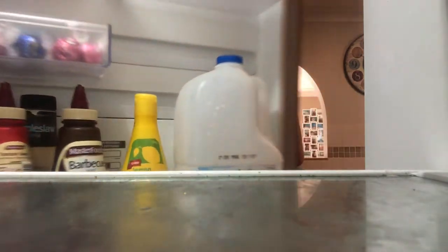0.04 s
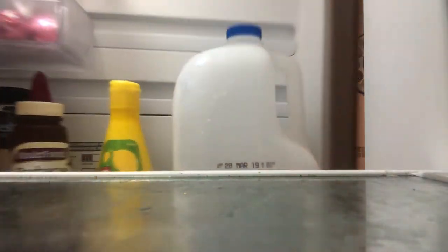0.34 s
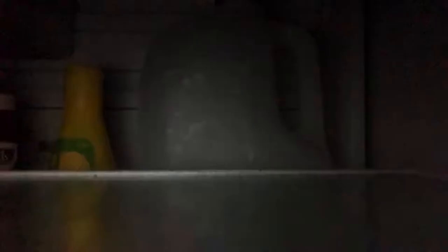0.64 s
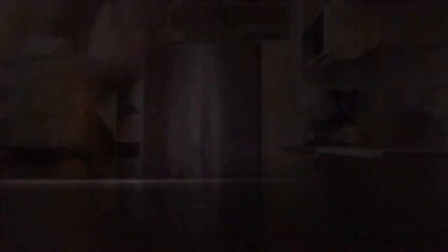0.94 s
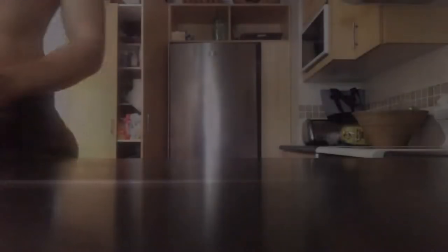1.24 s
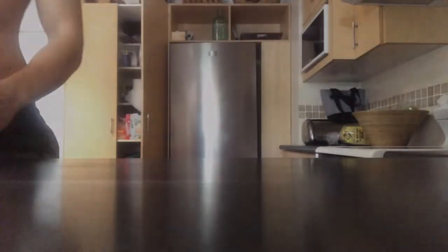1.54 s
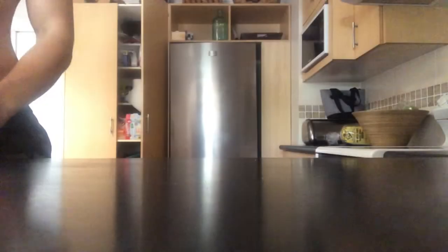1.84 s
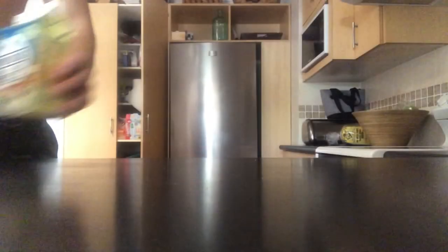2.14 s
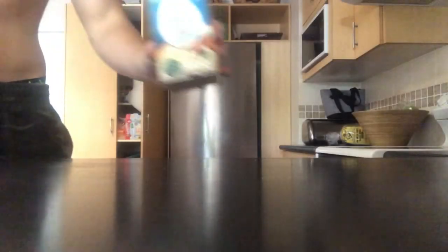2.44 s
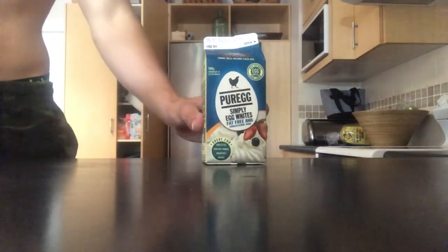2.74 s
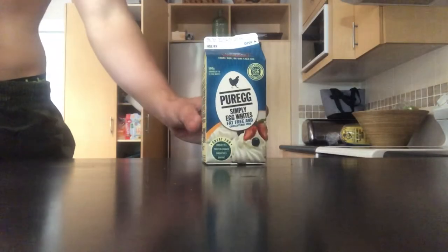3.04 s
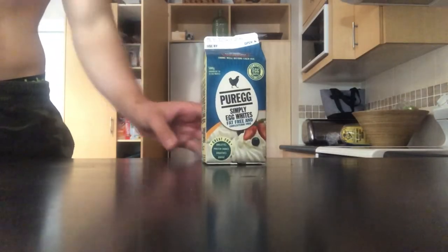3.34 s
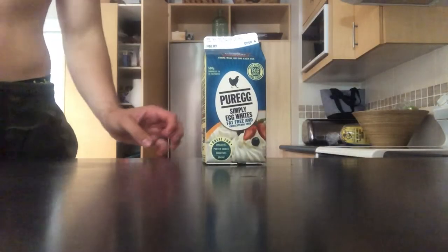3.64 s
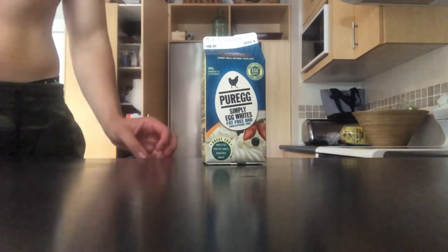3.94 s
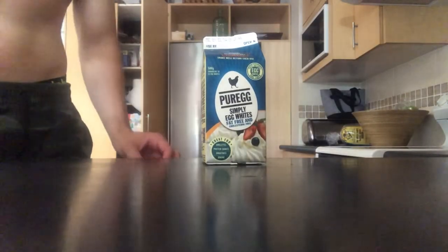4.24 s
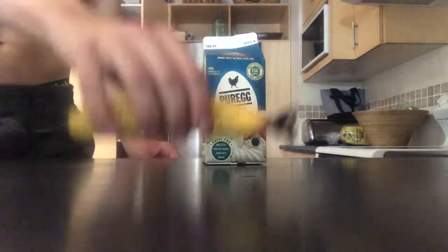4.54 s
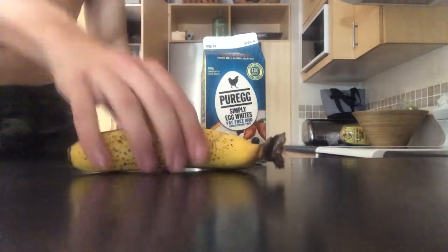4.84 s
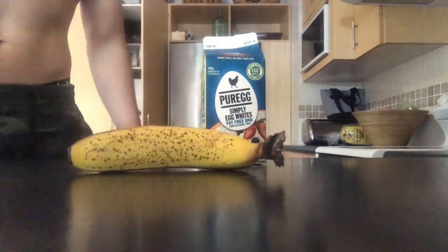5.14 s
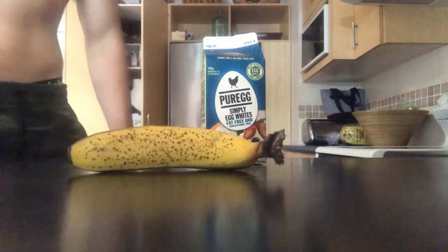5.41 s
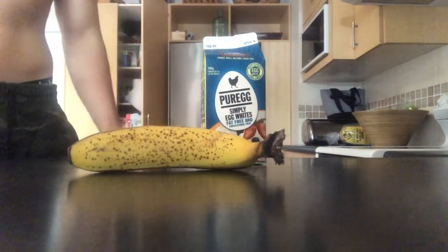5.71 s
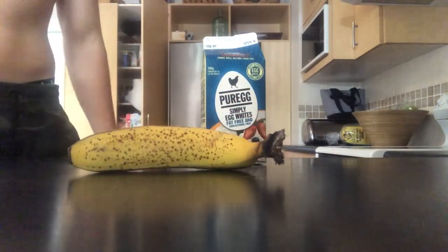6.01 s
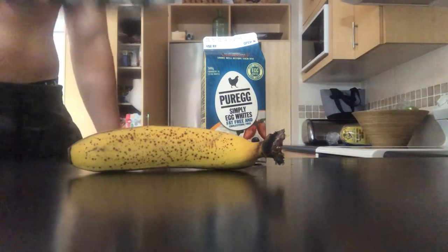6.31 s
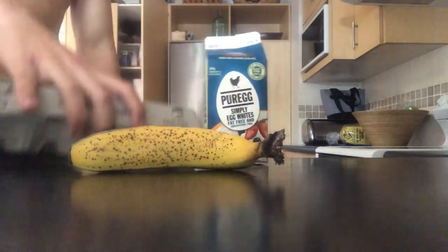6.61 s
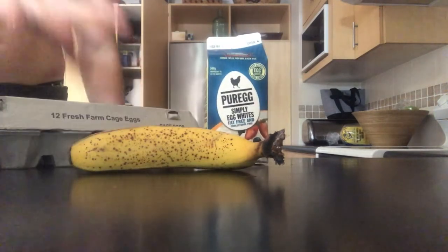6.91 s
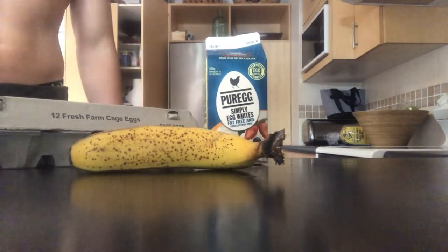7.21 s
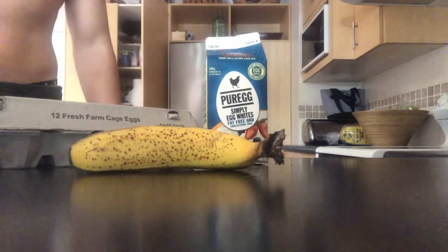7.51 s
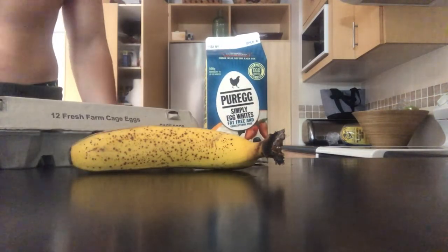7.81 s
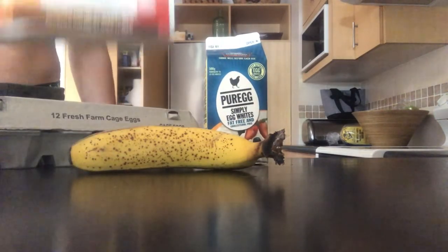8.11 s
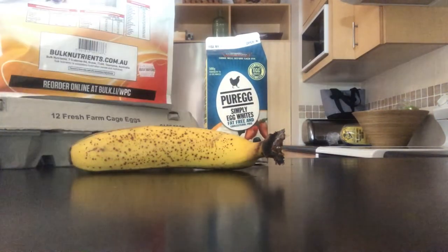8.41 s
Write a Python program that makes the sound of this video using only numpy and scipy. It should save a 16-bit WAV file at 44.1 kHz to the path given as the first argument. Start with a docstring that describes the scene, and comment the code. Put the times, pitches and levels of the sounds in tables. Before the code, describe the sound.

A fridge door swings with a faint drag and thin squeaks, heard from a shelf inside. At about 0.65 seconds it shuts with a slap of the seal and a deep boom, the loudest moment. The cabinet rumbles, shelves rattle and a bottle rocks, knocking sooner and softer until about 1.8 seconds. Faint squeaks come near 2.5 seconds, then a carton lands on a hard bench with a hollow knock at 2.7. Light finger taps and brushing follow, and a banana is put down with a soft, low bump at 4.7. After some scraping, an egg box lands with a quick double knock at 6.7 seconds, then is nudged with small taps and slides around 7.4. A pouch thunks down at 8.3 seconds, with a few more taps and scrapes. The knocks have a short kitchen echo, and a faint low hum of air and appliances continues throughout.

```python
"""Fridge door and kitchen bench

A fridge door swings shut, heard from a shelf inside. The seal slaps, the impact excites the cabinet's
low modes, and the shelves and a rocking bottle rattle on. Then a carton, a banana, a box of eggs and a
pouch are set down on a hard bench, each launching bending waves, while hands and packages brush it
with stick-slip friction. Faint squeaks, the kitchen's reverberation and a low murmur go with them."""
import sys
import numpy as np
from scipy import signal
from scipy.fft import rfft, irfft
from scipy.io import wavfile

SR = 44100
rng = np.random.default_rng(int(sys.argv[2]) if len(sys.argv) > 2 else 0)


def generate_wav(sig):
    """Save sig (samples, or channels by samples) to the path in sys.argv[1] as 16-bit PCM at SR."""
    pcm = np.round(np.clip(np.atleast_2d(sig).T, -1, 1) * 32767).astype(np.int16)
    wavfile.write(sys.argv[1], SR, pcm)


N = 373086
RING = np.arange(SR * 2 // 5) / SR   # time axis of one free decay, t/s
DOOR_LANDS_S = .654

# the registers thump, body, clack and tick: lowest f/Hz, centre f/Hz, highest f/Hz
REGISTER_BANDS = [(45, 120, 200), (200, 370, 700), (700, 1300, 2500), (2500, 4200, 16000)]
# spectrum of the room's murmur: f/Hz, relative level/dB
MURMUR_SPECTRUM = [(15, -54), (25, -26.5), (87, -4), (180, -8), (212, -8.5), (263, -3.5), (439, -7.5),
                   (476, -11), (754, -12.5), (936, -17), (2000, -25), (16000, -38)]
# resonances of the plastic liner and shelves: f/Hz, bandwidth/Hz, gain/dB
LINER_MODES = [(230, 58, 14.5), (290, 39, 10.5), (410, 50, 7), (545, 30, 8), (680, 60, 2.5), (990, 280, 1),
               (1370, 290, -0.5), (4800, 2000, 1.5)]
# envelopes of the cabinet's rumble and the shelves' chatter:
# relative swing level/dB, relative landing level/dB, rise/(dB/s), decay/(dB/s)
RUMBLE_ENVELOPE = (-49, -26.5, 200, 39)
CHATTER_ENVELOPE = (-59, -33, 500, 28.5)
# hinge and seal dragging: start t/s, end t/s, body/dB, clack/dB, tick/dB
HINGE_STROKES = [(.024, .055, -83, -66.5, -60), (.06, .16, -63, -64, -65.5),
                 (.292, .385, -59, -54.5, -68.5), (.632, .652, -34, -29.5, -26.5)]
# faint thin squeaks: t/s, start f/Hz, end f/Hz, relative level/dB
SQUEAK_GLIDES = [(0.209, 4470, 4460, -63.5), (0.248, 2206, 2485, -61), (.29, 3170, 3350, -63.5),
                 (0.378, 2980, 2576, -61.5), (2.43, 2760, 2650, -62), (2.457, 1373, 1352, -65),
                 (2.476, 2352, 2130, -58.5), (2.501, 3280, 3480, -64), (2.602, 5800, 6000, -64.5),
                 (2.619, 3166, 2840, -59)]
# the door's shelves and seal striking: t/s, contact time/s, level/dB, weight/dB, hardness/dB
DOOR_IMPACTS = [(.384, 0.0038, -46, -34, 2), (0.492, 0.0032, -31.5, -5.5, -18.5),
                (0.505, .019, -34, 5.5, -17.5), (.578, 0.025, -41, 8.5, 4.5),
                (0.6469, 0.0037, -13.5, 0.5, 0.5), (0.682, 0.021, -22, 9.5, -8),
                (0.729, 0.019, -31.5, 8.5, -2), (0.846, 0.014, -44, 10, 8), (.873, .005, -38, 6.5, 1),
                (1.068, .008, -55, 12.5, 2), (1.124, 0.0071, -45, -7, -14), (1.246, 0.0066, -45, 12, -5),
                (1.453, 0.0036, -52.5, 12, -14.5)]
# low modes of the cabinet: f/Hz, relative level/dB, T60/s
CABINET_MODES = [(33.4, -17.5, .35), (61, -5.5, .2), (74.57, 1, 0.12), (84, -21.5, .5), (95.3, -18.5, .4)]
# a bottle knocking on its shelf, sooner and softer as it settles: t/s, level/dB
BOTTLE_IMPACTS = [(.776, -32), (1.0118, -37), (1.198, -41.5), (1.391, -57), (1.518, -51.5), (1.623, -60),
                  (1.728, -63.5), (1.821, -69.5)]
# resonances of the bench top: f/Hz, bandwidth/Hz, gain/dB
BENCH_MODES = [(143, 47, 13), (249, 42, 7), (333, 23, 8), (484, 78, 2), (605, 77, -0.5), (798, 240, 1.5),
               (1170, 400, -3), (1535, 210, -10.5), (1940, 550, 0.5), (2390, 270, 0), (3930, 1700, -0.5),
               (5940, 1300, -8)]
# spectrum of a blow on the bench, a row per register: offset/dB, slope/(dB per dB of hardness)
IMPACT_COLOUR = [(-12, -0.1), (0.5, 0), (-2, 0.59), (-13.5, 1)]
# light taps and knocks: fingers and packages tapping the bench and each other, except the first row, the door's
# last bump: t/s, level/dB, hardness/dB
LIGHT_TAPS = [(1.834, -51.5, -27), (3.135, -53.5, -12), (3.19, -54.5, -9), (3.767, -47.5, 1),
              (3.782, -46, 5), (3.819, -49.5, 9.5), (3.924, -61, 12), (4.058, -50, -16.5), (4.599, -52, 3),
              (5.732, -45, 9), (6.082, -63, 2), (6.487, -41.5, -8), (6.509, -40, 8.5), (6.518, -42.5, 15.5),
              (6.572, -30, -12.5), (6.898, -28, 6.5), (7.343, -46, -1), (7.356, -32, -2.5),
              (7.4, -34, -0.5), (7.431, -41, 19), (7.464, -39.5, 0), (7.525, -33, -1.5), (7.677, -47, -4),
              (7.771, -42.5, -10), (7.845, -45.5, -14.5), (8.092, -52, -21.5), (8.211, -44.5, -17),
              (8.262, -40, -4), (8.316, -31.5, -2), (8.331, -45.5, 12), (8.376, -34, -16), (8.398, -34, 7),
              (8.425, -32, 9), (8.452, -38, -5)]
# packages and fruit landing: t/s, contact time/s, level/dB, hardness/dB, thump/dB
FOOD_LANDINGS = [(2.7352, 0.0023, -17.5, -6.5, -19), (4.718, 0.0053, -45, 1, -32.5),
                 (6.696, 0.00052, -31.5, 2, -25), (6.728, .0062, -19, 1.5, -18.5),
                 (8.2692, 0.0048, -15, 0.5, -16.5)]
# the hollow note of each item as it lands: t/s, f/Hz, level/dB, T60/s
FOOD_MODES = [(2.738, 355, -8.5, 0.035), (4.723, 128.6, -23.5, 0.11), (6.6932, 1322, -2.5, 0.0078),
              (8.274, 542, -5.5, 0.021)]
# hands and packages sliding: start t/s, end t/s, relative level/dB, hardness/dB
SLIDE_STROKES = [(3.558, 3.745, -59.5, -4.5), (3.77, 3.848, -51.5, -4.5), (3.865, 3.934, -54, 2),
                 (4.06, 4.139, -53, -22.5), (4.518, 4.563, -55.5, 2.5), (4.566, 4.691, -61.5, -5.5),
                 (4.768, 4.888, -70, -2), (5.201, 5.401, -77, 3.5), (5.611, 5.718, -52.5, 1),
                 (5.73, 5.811, -57, 4.5), (5.852, 6.049, -57.5, -32), (6.252, 6.356, -73, 11),
                 (6.356, 6.398, -59.5, 9.5), (6.452, 6.513, -47.5, -9), (6.518, 6.624, -36, -23.5),
                 (6.631, 6.694, -51.5, -9.5), (6.814, 6.892, -53, 0), (6.886, 6.899, -34, -8),
                 (7.363, 7.521, -40.5, -15.5), (7.428, 7.467, -54.5, 6), (7.538, 7.676, -64.5, 1),
                 (8.237, 8.275, -48, -6.5), (8.299, 8.465, -46.5, -8.5)]
# spectrum of a slide, a row per register: offset/dB, slope/(dB per dB of hardness)
SLIDE_COLOUR = [(-3, 0.2), (-2, 0), (-0.5, 0.52), (-1, 1)]


def amp(db):
    """Amplitude ratio of a level in decibels."""
    return 10 ** (np.asarray(db) / 20)


def unit_rms(x):
    """Normalisation to unit mean power."""
    return x / np.sqrt(np.mean(x ** 2) + 1e-20)


def unit_energy(x):
    """Normalisation to unit total energy."""
    return x / np.sqrt(np.sum(x ** 2) + 1e-20)


def butter(x, hz, kind, order=2):
    """Butterworth filtering: a maximally flat passband."""
    sections = signal.butter(order, np.clip(hz, 10, .45 * SR), kind, fs=SR, output="sos")
    return signal.sosfilt(sections, x + 1e-18)


def add(track, start_s, sound):
    """Superposition: a sound adds to the track from start_s on."""
    at = int(start_s * SR)
    track[at:at + len(sound)] += sound[:N - at]


def diffuse_tail(t60):
    """Diffuse decay: dense reflections merge into exponentially fading noise of unit energy."""
    return unit_energy(rng.standard_normal(len(RING)) * amp(-60 * RING / t60))


def modal_response(modes):
    """Modal superposition: an impulse plus each damped resonance it excites."""
    click = signal.unit_impulse(len(RING))
    out = click.copy()
    for hz, width_hz, db in modes:
        radius = np.exp(-np.pi * width_hz / SR)
        numerator = np.array([1, 0, -1]) * (1 - radius ** 2) / 2
        denominator = [1, -2 * radius * np.cos(2 * np.pi * hz / SR), radius ** 2]
        out += amp(db) * signal.lfilter(numerator, denominator, click)
    return out


def minimum_phase(gain):
    """Causality: a gain curve takes its minimum phase, so nothing sounds before its cause."""
    cepstrum = irfft(np.log(gain))
    half = len(cepstrum) // 2
    cepstrum[1:half] *= 2
    cepstrum[half + 1:] = 0
    return np.exp(rfft(cepstrum))


def driven_body(force, response, levels_db, length_s=.01, size=32768):
    """Forced response, equalised so each register has the energy of its level held for length_s."""
    spectrum = rfft(butter(force, 66, "high", order=4), size) * rfft(response, size)
    hz = np.arange(size // 2 + 1) * SR / size
    log_centres = np.log([centre for _, centre, _ in REGISTER_BANDS])
    colour = np.ones(len(hz))
    for _ in range(3):   # the smooth gain curve converges on the levels
        energy = np.abs(spectrum * colour) ** 2 * 2 / size
        band_energy = np.array([energy[(hz >= low) & (hz < high)].sum() for low, _, high in REGISTER_BANDS])
        band_rms = np.sqrt(band_energy / (length_s * SR))
        colour *= np.exp(np.interp(np.log(1 + hz), log_centres, np.log(amp(levels_db) / band_rms)))
    return irfft(spectrum * minimum_phase(colour))


def microslips(size, spread_db):
    """Stick-slip force: countless tiny slips of very uneven size."""
    return unit_rms(rng.standard_normal(size) * amp(spread_db * np.minimum(rng.exponential(1, size), 6)))


def room_murmur(level_db=-61):
    """Stationary noise: air and appliances murmur, chiefly in the bass."""
    hz, db = np.transpose(MURMUR_SPECTRUM)
    bin_hz = np.arange(N // 2 + 1) * SR / N
    colour = amp(np.interp(np.log(1 + bin_hz), np.log(hz), db))
    return amp(level_db) * unit_rms(irfft(rfft(rng.standard_normal(N)) * colour, N))


def fridge_response(cavity_db=-0.5, cavity_t60=0.12, top_hz=7500, air_share=.15):
    """Cavity reverberation: the liner's resonances echo densely in a small hard enclosure."""
    cavity = signal.unit_impulse(len(RING)) + amp(cavity_db) * diffuse_tail(cavity_t60)
    sound = signal.fftconvolve(modal_response(LINER_MODES), cavity)[:len(RING)]
    return butter(sound, top_hz, "low", order=1) + air_share * butter(sound, 5000, "low")


def tremble_envelope(swing_db, landing_db, rise_db_per_s, fade_db_per_s, attack_s=0.08):
    """Exponential growth and decay: trembling swells as the door squeezes the air out, then dies."""
    t = np.arange(N) / SR
    since_landing = t - DOOR_LANDS_S
    swinging = amp(swing_db) * np.clip(t / attack_s, 0, 1)
    landing = amp(landing_db + rise_db_per_s * np.minimum(since_landing, 0))
    return (swinging + landing) * amp(-fade_db_per_s * np.maximum(since_landing, 0))


def door_tremble(response):
    """Random vibration: the loaded door makes the cabinet rumble and the shelves chatter."""
    def band(x, edges_hz):
        return unit_rms(butter(x, edges_hz, "band"))

    chatter = signal.fftconvolve(microslips(N, spread_db=3.5), response)[:N]
    rumble = band(rng.standard_normal(N), [68, 108]) + amp(-7.5) * band(rng.standard_normal(N), [28, 65])
    shelves = band(chatter, [200, 420]) + amp(-15) * band(chatter, [600, 1400])
    rumble *= tremble_envelope(*RUMBLE_ENVELOPE)
    shelves *= tremble_envelope(*CHATTER_ENVELOPE)
    return rumble + amp(4) * shelves


def door_part(force, response, levels_db, length_s=.01, thump_db=-17):
    """Radiation from light parts: little bass, with the thump set relative to the body register."""
    return driven_body(force, response, [levels_db[0] + thump_db, *levels_db], length_s)


def friction(strokes, radiate, response, spread_db, catch_db, fade_share):
    """Sliding friction: surfaces catch and let go, driving a body in short grainy strokes."""
    out = np.zeros(N)
    for start, end, *levels_db in strokes:
        length_s = end - start
        size = int(length_s * SR)
        grip = amp(catch_db * unit_rms(butter(rng.standard_normal(len(RING)), 50, "low"))[-size:])
        force = microslips(size, spread_db) * grip * signal.windows.tukey(size, fade_share)
        add(out, start, radiate(butter(force, 8290, "low", order=1), response, levels_db, length_s))
    return out


def door_swing(response):
    """Frictional excitation: the dragging hinge and seal drive the liner."""
    return friction(HINGE_STROKES, door_part, response, spread_db=4, catch_db=3, fade_share=0.89)


def squeaks(length_s=.12):
    """Narrow-band friction noise: thin, airy tones that glide, swell and fade."""
    out, size = np.zeros(N), int(length_s * SR)
    swell = np.hanning(size) ** .5
    for s, start_hz, end_hz, db in SQUEAK_GLIDES:
        glide = np.exp(2j * np.pi * np.cumsum(np.linspace(start_hz, end_hz, size)) / SR)
        flutter = butter(rng.standard_normal(size) + 1j * rng.standard_normal(size), 60, "low", order=1)
        add(out, s, amp(db) * swell * unit_rms((flutter * glide).real))
    return out


def kitchen_reverb(x, first_echo_s=0.003, build_s=0.0046):
    """Reverberation: the hard room's diffuse field decays sooner in the bass and the top treble."""
    tail = (amp(-3) * butter(diffuse_tail(t60=.25), [90, 300], "band")
            + butter(diffuse_tail(t60=.52), [300, 1800], "band")
            + butter(diffuse_tail(t60=.54), [1800, 6000], "band")
            + amp(-2) * butter(diffuse_tail(t60=.41), [6000, 16000], "band"))
    onset = np.clip((RING - first_echo_s) / build_s, 0, 1)
    return signal.fftconvolve(x, tail * onset)[:N]


def contact_force(contact_s, crunch_db):
    """Rough-surface impact: one impulse, then a crush of small contacts as the surfaces settle."""
    age = np.arange(int(6 * contact_s * SR) + 2) / (contact_s * SR)   # in contact times
    crush = microslips(len(age), spread_db=2.5) * np.sqrt(age) * np.exp(-1.5 * age)
    force = amp(crunch_db) * unit_energy(crush)
    force[0] += 1
    return force


def door_rattles():
    """Impact excitation: the shelves knock and the seal slaps, each from its own spot."""
    out = np.zeros(N)
    for s, contact_s, db, weight_db, hardness_db in DOOR_IMPACTS:
        force = contact_force(contact_s, crunch_db=11.5)
        levels_db = [db + weight_db, db, db + hardness_db]   # body, clack, tick
        add(out, s, door_part(force, fridge_response(), levels_db, thump_db=-14))
    return out


def cabinet_boom(rise_s=.016, gain_db=6.5):
    """Free vibration: the door lands on its soft seal and the cabinet rings in its low modes."""
    out = np.zeros(N)
    modes = sum(amp(db - 60 * RING / t60) * np.sin(2 * np.pi * hz * RING) for hz, db, t60 in CABINET_MODES)
    add(out, DOOR_LANDS_S, modes * (1 - np.exp(-RING / rise_s)))
    return amp(gain_db) * out


def damped_note(hz, db, t60, rise_cycles):
    """Damped oscillator: a light body swells and rings, radiating little below its own pitch."""
    swell = 1 - np.exp(-RING * hz / rise_cycles)
    ring = amp(db - 60 * RING / t60) * np.sin(2 * np.pi * hz * RING)
    return butter(swell * ring, 0.64 * hz, "high")


def rocking_bottle():
    """Damped rocking: after the slam a bottle knocks as it settles, and its shelf hums each time."""
    out = np.zeros(N)
    for s, db in BOTTLE_IMPACTS:
        response = fridge_response(cavity_db=-3, top_hz=10600, air_share=0.21)
        force = contact_force(contact_s=0.0046, crunch_db=11)
        levels_db = [db + 7, db, db + 3]   # body, clack, tick
        add(out, s, door_part(force, response, levels_db, thump_db=-5.5))
        add(out, s, damped_note(hz=243.6, db=db + 16, t60=0.14, rise_cycles=3.1))
    return out


def bench_response(lag_cycles=2.086, slowest_hz=60, top_hz=5800, air_share=.55, scatter_db=-4.5):
    """Dispersion of bending waves: treble arrives before bass, and both scatter off the bench's edges."""
    size = 2 * len(RING)
    hz = np.arange(len(RING) + 1) * SR / size
    dispersion = np.exp(-2j * np.pi * lag_cycles * np.log(1 + hz / slowest_hz))
    edge_echoes = butter(diffuse_tail(t60=0.068), 312, "high")
    scatter = 1 + amp(scatter_db) * rfft(edge_echoes, size)
    wave = irfft(rfft(modal_response(BENCH_MODES), size) * dispersion * scatter)[:len(RING)]
    return butter(wave, top_hz, "low") + air_share * butter(wave, top_hz, "low", order=1)


def register_levels(colour, db, hardness_db):
    """Spectral tilt: the harder the touch, the more the upper registers dominate."""
    offset_db, slope = np.transpose(colour)
    return db + offset_db + slope * hardness_db


def bench_blow(contact_s, levels_db):
    """Point excitation of a plate: one blow on the bench, at a spot of its own."""
    return driven_body(contact_force(contact_s, crunch_db=9), bench_response(), levels_db)


def bench_knocks(settle_s=0.018, settle_loss_db=9.5):
    """Successive impacts: things land on one edge, then on their base; light taps come in between."""
    out = np.zeros(N)
    for s, contact_s, db, hardness_db, thump_db in FOOD_LANDINGS:
        levels_db = register_levels(IMPACT_COLOUR, db, hardness_db)
        add(out, s, bench_blow(contact_s, [thump_db, *levels_db[1:]]))
        add(out, s + settle_s, bench_blow(contact_s=0.0056, levels_db=levels_db - settle_loss_db))
    for s, db, hardness_db in LIGHT_TAPS:
        levels_db = register_levels(IMPACT_COLOUR, db, hardness_db)
        add(out, s, bench_blow(contact_s=0.0024, levels_db=levels_db))
    return out


def food_resonances():
    """Resonance: carton, banana, egg box and pouch each ring briefly at their natural frequency."""
    out = np.zeros(N)
    for s, hz, db, t60 in FOOD_MODES:
        add(out, s, damped_note(hz, db, t60, rise_cycles=0.44))
    return out


def bench_slides():
    """Frictional excitation: brushing hands and sliding packages drive the bench's modes."""
    response = butter(modal_response(BENCH_MODES), 16000, "low", order=1)
    strokes = [(start, end, *register_levels(SLIDE_COLOUR, db, hardness_db))
               for start, end, db, hardness_db in SLIDE_STROKES]
    return friction(strokes, driven_body, response, spread_db=3.5, catch_db=2, fade_share=0.15)


def scene():
    """Direct and reverberant sound add: the fridge shuts, then food is set out in the echoing kitchen."""
    interior = fridge_response()
    fridge = door_swing(interior) + cabinet_boom() + door_rattles() + rocking_bottle()
    fridge += door_tremble(interior)
    sliding = amp(-2.5) * bench_slides()
    impacts = bench_knocks() + food_resonances()
    squeaking = squeaks()
    reverb = kitchen_reverb(amp(-10.5) * impacts + amp(-5) * sliding + amp(-0.5) * squeaking)
    return (fridge + impacts + sliding + amp(-2.5) * squeaking + reverb + room_murmur())[None]


def record(dry, cutoff_hz=16000):
    """Soft saturation: the boom just overloads the microphone; a steep low-pass limits the treble."""
    rounded = dry / (1 + dry ** 6) ** (1 / 6)
    return signal.sosfilt(signal.ellip(10, .1, 80, cutoff_hz, fs=SR, output="sos"), rounded)


dry = scene()
out = record(dry)
generate_wav(out)
```